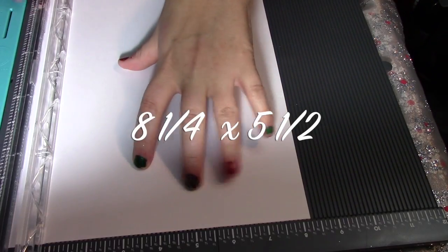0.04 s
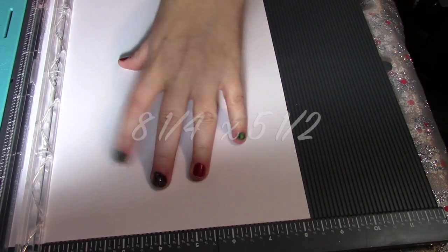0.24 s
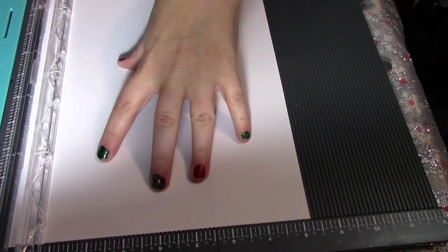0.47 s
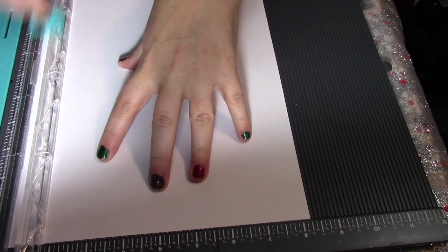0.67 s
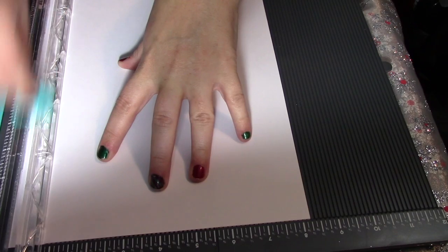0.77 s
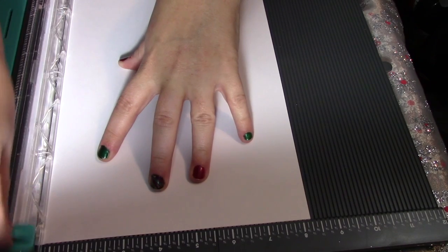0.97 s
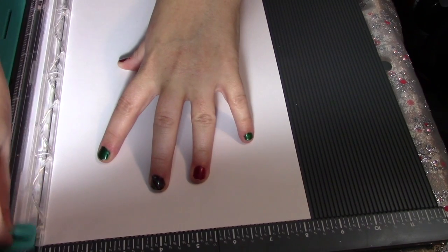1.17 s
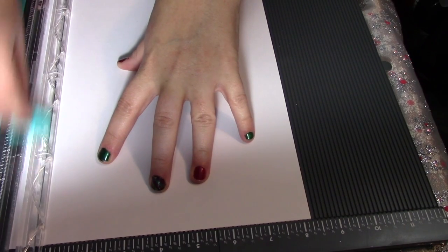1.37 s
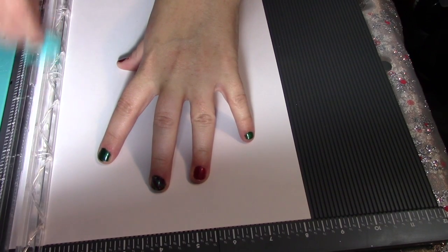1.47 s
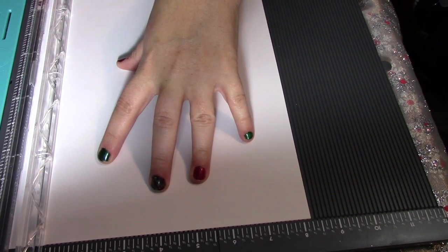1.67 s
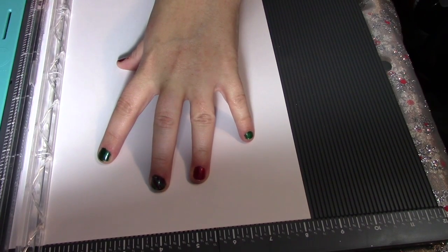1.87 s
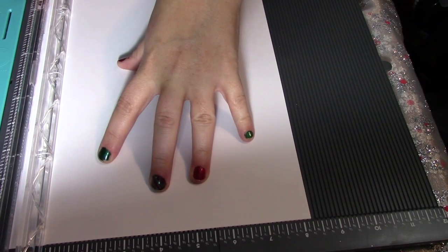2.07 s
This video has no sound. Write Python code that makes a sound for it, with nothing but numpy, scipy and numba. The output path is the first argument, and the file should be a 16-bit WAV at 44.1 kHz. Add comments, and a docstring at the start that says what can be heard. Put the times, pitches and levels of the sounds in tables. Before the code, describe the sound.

Paper trimmer cutting card in one scraping stroke, then sliding back with sharp plastic clicks.

```python
"""Paper trimmer on a craft table

A card brushes over the bed and the plastic guide rail clacks down. The blade carriage rasps through
the card, its friction grains ringing the rail, knocks against the far stop, slides back more lightly
and snaps against the near stop. Each knock is a noise crack plus damped modes. The table rings along;
the sound is close and nearly mono, in a small room with faint steady noise."""
import sys
import numpy as np
from scipy import signal
from scipy.fft import rfft, irfft
from scipy.io import wavfile
from scipy.ndimage import uniform_filter1d, minimum_filter1d
from numba import njit

SR = 44100
rng = np.random.default_rng(int(sys.argv[2]) if len(sys.argv) > 2 else 0)


def store_pcm(level_fs):
    """Save levels as 16-bit WAV."""
    pcm = np.round(np.clip(level_fs, -1, 1) * 32767).astype(np.int16)
    wavfile.write(sys.argv[1], SR, np.atleast_2d(pcm).T)


N = 93315
T = np.arange(N) / SR


def undb(db):
    """Decibels to gain."""
    return 10 ** (np.asarray(db) / 20)


def unit_rms(x):
    """Scale to rms 1."""
    return x / np.sqrt(np.mean(x ** 2))


def unit_energy(x):
    """Scale to energy 1."""
    return x / np.sqrt(np.sum(x ** 2))


def convolve(x, response):
    """Convolve, keeping the length."""
    return signal.fftconvolve(x, response)[:len(x)]


def colour(x, spectrum, size=2048):
    """Minimum-phase filter from (f/Hz, level/dB) points."""
    hz, db = np.array(spectrum, float).T
    bins_hz = np.arange(size // 2 + 1) * SR / size
    gain = undb(np.interp(np.log(bins_hz + 1), np.log(hz), db))
    cepstrum = irfft(np.log(gain))
    cepstrum[1:size // 2] *= 2
    cepstrum[size // 2 + 1:] = 0
    return convolve(x, irfft(np.exp(rfft(cepstrum))))


def split(x, edges_hz):
    """Zero-phase bands that sum flat."""
    bands = []
    for hz in edges_hz:
        bands.append(signal.sosfiltfilt(signal.butter(3, hz, fs=SR, output="sos"), x, padtype=None))
        x = x - bands[-1]
    return bands + [x]


def ring(modes, t, wave=np.sin):
    """Damped sinusoids from (f/Hz, level/dB, t60/s) rows."""
    return sum(undb(db - 60 * t / t60) * wave(2 * np.pi * hz * t) for hz, db, t60 in modes)


def wander(rate_hz):
    """Smooth random curve, rms 1."""
    hold = int(SR / rate_hz)
    steps = np.repeat(rng.standard_normal(N // hold + 1), hold)
    return unit_rms(uniform_filter1d(steps, hold)[:N])


@njit
def resonate(x, hz, width_hz):
    """State-variable band-pass with a moving centre."""
    y, band_state, low_state = np.empty(len(x)), 0., 0.
    for i in range(len(x)):
        g, damping = np.tan(np.pi * hz[i] / SR), width_hz / hz[i]
        band = (band_state + g * (x[i] - low_state)) / (1 + g * (g + damping))
        band_state = 2 * band - band_state
        low_state += 2 * g * band
        y[i] = damping * band
    return y


# noise spectrum: f/Hz, level/dB
ROOM_NOISE_SPECTRUM = [(25,-9),(60,-11.5),(110,3.5),(330,10),(500,5.5),(1000,1.5),(3000,-5.5),(8000,-15),(12000,-18),(16000,-28.5)]

def room_noise(level_db=-57.5):
    """Steady, dull background noise."""
    return undb(level_db) * unit_rms(colour(rng.standard_normal(N), ROOM_NOISE_SPECTRUM))


def grains(rate_per_s=6500, scatter_db=.7):
    """Friction: dense tiny slips and snapping fibres of uneven size."""
    impulses = (rng.random(N) < rate_per_s / SR) * rng.choice([-1, 1], N)
    return impulses * undb(scatter_db * np.minimum(rng.exponential(size=N), 4))


# card moves: t/s, length/s, hiss level/dB, rub level/dB
BRUSHES = [(0.042,0.057,-47,-69),(0.217,0.071,-50,-42.5),(0.287,0.095,-60,-52)]
# hiss and rub spectra: f/Hz, level/dB
HISS_SPECTRUM = [(2000,-16),(5000,-9),(6500,1.5),(8500,2.5),(11000,-10),(16000,-21)]
RUB_SPECTRUM = [(60,-39),(130,5),(300,1),(600,9),(1100,-11),(3000,-9.5),(8000,-44)]

def card_brushes():
    """The card slips over the bed under the hand: soft hiss over a dull rub."""
    hiss = unit_rms(colour(grains(), HISS_SPECTRUM))
    rub = unit_rms(colour(grains(), RUB_SPECTRUM))
    out = 0
    for start_s, length_s, hiss_db, rub_db in BRUSHES:
        progress = np.clip((T - start_s) / length_s, 0, 1)
        swell = np.abs(np.sin(np.pi * progress)) ** .95
        out += swell * (undb(hiss_db) * hiss + undb(rub_db) * rub)
    return out


# contact noise spectrum: f/Hz, level/dB
CRACK_SPECTRUM = [(40,-35.5),(80,-7.5),(130,4),(300,3),(600,-0.5),(1000,4),(1700,4),(4200,-1),(5000,-2.5),(6500,1.5),(9000,-4),(12000,-9),(16000,-31)]

def knocks(hits, modes, edges_hz=(280, 900, 2200, 4600)):
    """Chattering contact, short plastic ring and dry rattle, levelled in five bands; treble dies first."""
    contact_s, seat_s, level_span_s = .0025, .002, .003
    crack_decay_s, rattle_decay_s, tick_decay_s, tick_rest_db = .0014, .015, .0034, -10
    lead = SR // 200  # space for the band filters' pre-ring
    t = np.maximum(T[:SR // 7] - lead / SR, 0)
    attack = np.minimum(t / contact_s, 1) ** .5
    contact = unit_energy(attack * np.exp(-np.maximum(t - contact_s, 0) / crack_decay_s))
    rattle = unit_energy(attack * np.exp(-t / rattle_decay_s))
    out = np.zeros(2 * N)
    for start_s, *bands_db, modes_db, rattle_db in hits:
        envelope = np.hypot(contact, undb(rattle_db) * rattle)
        crack = colour(envelope * rng.standard_normal(len(t)), CRACK_SPECTRUM)
        detuned = [(hz * (1 + .012 * rng.standard_normal()), db, t60) for hz, db, t60 in modes]
        ringing = ring(detuned, t) * (1 - np.exp(-t / seat_s))
        bands = split(undb(modes_db) * unit_energy(ringing) + unit_energy(crack), edges_hz)
        bands[-1] *= np.exp(-t / tick_decay_s) + undb(tick_rest_db)
        i = int(start_s * SR) - lead
        for band, db in zip(bands, bands_db):
            out[i:i + len(t)] += unit_energy(band) * undb(db) * np.sqrt(level_span_s * SR)
    return out[:N]


# card and rail hits: t/s, 5 x band level/dB (low to high), modes/dB re crack, rattle/dB re contact
RAIL_HITS = [(.1725,-42,-48,-43,-45,-37,-17,-2),(.1790,-56,-40.5,-43.5,-74,-33.5,-22,-30),(.2260,-42.5,-31,-51,-68,-52,-7,2),(.2670,-59,-37,-23.5,-18.5,-37.5,-1.5,-3),(.2895,-60,-32,-31,-46,-52,-26,-4),(.4175,-63,-41.5,-37.5,-34.5,-75,-30,-1.5)]
# rail modes: f/Hz, level/dB, t60/s
RAIL_MODES = [(574,-6,0.038),(805,-9.5,0.058),(1730,1.5,0.022),(3356,-10,0.025),(4100,8,0.015),(6000,-3,0.019)]

def rail_clacks():
    """The card is nudged and the guide rail clacks down."""
    return knocks(RAIL_HITS, RAIL_MODES)


def squeaks(rate_per_s=600, range_hz=(2500, 14000), length_s=.014, max_glide=.03):
    """Fibres and plastic squeak: short gliding whistles, random in time and pitch."""
    out, t = np.zeros(2 * N), T[:int(length_s * SR)]
    for when, pitch, glide, size in rng.random((int(rate_per_s * N / SR), 4)):
        hz = np.interp(pitch, (0, 1), range_hz) * (1 + max_glide * (2 * glide - 1) * t / length_s)
        i = int(when * N)
        out[i:i + len(t)] += size ** 2 * np.hanning(len(t)) * np.sin(2 * np.pi * np.cumsum(hz) / SR)
    return unit_rms(out[:N])


# sliding friction spectrum: f/Hz, level/dB
FRICTION_SPECTRUM = [(30,-72.5),(70,-27.5),(120,-5),(300,-0.5),(700,-4),(2000,-1.5),(4000,-7),(7000,-8.5),(10000,-12.5),(13000,-22.5),(16000,-28.5)]
# rail and bed resonances: f/Hz, width/Hz, cutting level/dB, return level/dB
SLIDE_RESONANCES = [(252.5,28,1,0),(338,12,-7,-2.5),(464,250,3,-14),(588,47,-1.5,-1),(720,87,10.5,2),(861,75,6.5,-1),(976,14,-8,5.5),(1164,193,3.5,-2.5),(1384,83,-4,3),(1644,77,2,7.5),(2137,60,-1.5,-5),(3003,590,3.5,5),(3610,86,3,0),(4180,270,-0.5,-16.5),(5700,990,-6,-16),(8630,490,3,-1.5),(9600,480,0,-8),(11920,600,-4.5,-11)]

def slide(envelope, cutting, edges_hz=(1500, 5000)):
    """Juddering friction grains ring the rail, whose resonances waver as the contact moves."""
    judder_db, judder_hz, waver_db, waver_hz = 1.3, 140, 2.6, 65
    bypass_db, squeak_db = -6.5, -10.5
    judder = undb(judder_db * wander(judder_hz))
    slips = grains() * judder
    body = undb(bypass_db) * grains() * judder
    for hz, width_hz, cut_db, return_db in SLIDE_RESONANCES:
        drift = .018 * (1 + hz / 5000)  # high resonances wander furthest
        centre_hz = hz * (1 + drift * wander(waver_hz / 2))
        level_db = (cut_db if cutting else return_db) + waver_db * wander(waver_hz)
        body += undb(level_db) * resonate(slips, centre_hz, float(width_hz))
    friction = colour(unit_rms(body) + undb(squeak_db) * squeaks(), FRICTION_SPECTRUM)
    times_s, *bands_db = np.array(envelope).T
    sliding = (T > times_s[0]) & (T < times_s[-1])
    gains = [undb(np.interp(T, times_s, db, left=-120, right=-120)) for db in bands_db]
    return sum(band / band[sliding].std() * gain for band, gain in zip(split(friction, edges_hz), gains))


# cut envelope: t/s, body level/dB, rasp level/dB, hiss level/dB
CUT_ENVELOPE = [(.43,-57.5,-69.5,-75),(.555,-56.5,-51,-56),(.572,-44,-46.5,-54),(.586,-29,-27.5,-33),(.66,-32.5,-28.5,-29),(.75,-28.5,-28,-29.5),(.83,-27.5,-27,-30),(.91,-29,-27.5,-30.5),(1.0,-37.5,-33.5,-39),(1.025,-35,-40,-52)]

def cut_stroke():
    """The blade carriage rasps through the card."""
    return slide(CUT_ENVELOPE, cutting=True)


# bed hits: columns as RAIL_HITS
BED_HITS = [(.5745,-38,-22,-19.5,-31.5,-42,5,-20),(1.1718,-47,-39,-31,-51,-42,-20,-4),(1.6575,-46.5,-28,-28.5,-31.5,-51.5,-13.5,-2.5)]
# bed modes: f/Hz, level/dB, t60/s
BED_MODES = [(378,-4,0.038),(493,5.5,0.017),(1228,3.5,0.021),(1490,1.5,0.025),(3170,-15.5,.012)]

def bed_bumps():
    """The blade is pressed onto the bed; later the carriage bumps on it."""
    return knocks(BED_HITS, BED_MODES)


# carriage hits: columns as RAIL_HITS
CARRIAGE_HITS = [(.7858,-54,-37,-19,-46,-44,-25,-22),(1.1440,-41.5,-44.5,-41.5,-45,-48,-17,7),(1.1565,-50.5,-40,-52,-39.5,-65,-16,-12),(1.7604,-45,-30,-17,-6.5,-20.5,4,-5.5),(1.7730,-45,-38.5,-28.5,-21,-33.5,-10,6),(1.8905,-65,-32.5,-32,-30.5,-59,-28,2.5),(1.964,-66,-74,-61.5,-58,-57.5,-12,-3)]
# carriage modes: f/Hz, level/dB, t60/s
CARRIAGE_MODES = [(671,-9,.03),(830,-8.5,0.034),(1432,-6,0.035),(1717,7.5,0.012),(2500,-14.5,.015),(3030,-8,.01),(3750,8.5,.008),(4100,-2,0.0068),(5950,2.5,0.0076)]

def carriage_knocks():
    """The carriage knocks on its way, then snaps against the near stop and rebounds."""
    return knocks(CARRIAGE_HITS, CARRIAGE_MODES)


# far stop hit: columns as RAIL_HITS
FAR_STOP_HITS = [(1.0064,-28.5,-23.5,-23.5,-13,-29.5,0,-5)]
# far stop modes: f/Hz, level/dB, t60/s
FAR_STOP_MODES = [(244,-10.5,0.11),(596,-0.5,0.043),(1340,0.5,0.06),(1735,5,0.028),(2036,-1,0.027),(2665,-3,.02),(3330,7,0.014),(4120,-8,0.016),(5900,-0.5,0.044)]

def far_stop_knock():
    """The carriage meets the far stop at the end of the cut."""
    return knocks(FAR_STOP_HITS, FAR_STOP_MODES)


# return envelope: t/s, body level/dB, rasp level/dB, hiss level/dB
RETURN_ENVELOPE = [(1.15,-80,-52,-90),(1.215,-49,-51,-54),(1.25,-42.5,-35.5,-43.5),(1.365,-41,-42.5,-45.5),(1.385,-31.5,-28.5,-41),(1.42,-42,-41.5,-41),(1.475,-30,-29.5,-40.5),(1.51,-36,-34.5,-43.5),(1.56,-35.5,-30.5,-44.5),(1.64,-38.5,-42.5,-52),(1.70,-51,-49,-58),(1.77,-53,-54.5,-58.5)]

def return_stroke():
    """The carriage slides back more lightly."""
    return slide(RETURN_ENVELOPE, cutting=False)


# craft table modes: f/Hz, level/dB, t60/s
TABLE_MODES = [(252,-59,.24),(339,-55,.24),(490,-58,.16),(603,-58,.18),(688,-55,.18),(870,-61,.14)]

def table_ring(direct):
    """The table rings under the trimmer."""
    return convolve(direct, ring(TABLE_MODES, T, np.cos))


# reflection spectrum: f/Hz, level/dB
ROOM_SPECTRUM = [(60,5),(200,6),(800,-1.5),(2500,-8),(4500,-11),(8000,-13),(16000,-37.5)]

def room_reverb(direct, edges_hz=(700, 2500, 6000), t60s_s=(.17, .19, .22, .24)):
    """Early reflections from the table top and the short tail of the room."""
    delay_s, early_decay_s, early_db, tail_db = .0069, .017, -15.5, -8.5
    t = T[:SR // 2]
    bands = split(rng.standard_normal(len(t)), edges_hz)
    tail = sum(band * undb(-60 * t / t60) for band, t60 in zip(bands, t60s_s))
    early = rng.standard_normal(len(t)) * np.exp(-t / early_decay_s)
    arrived = t > delay_s
    response = undb(tail_db) * unit_energy(tail * arrived) + undb(early_db) * unit_energy(early * arrived)
    return convolve(direct, colour(response, ROOM_SPECTRUM))


# side signal re mid: f/Hz, level/dB
LEAN_SPECTRUM = [(1000,-87),(2500,-34.5),(10000,-31.5)]
# microphone noise spectrum: f/Hz, level/dB
MIC_NOISE_SPECTRUM = [(25, 0), (100, -1.5), (300, 8.5), (1000, .5), (5000, -19), (16000, -36)]

def microphones(mid, lag_s=1.5e-6, noise_db=-67):
    """Nearly mono pair: treble leaning slightly left, a tiny lag and faint noise between the two."""
    noise = undb(noise_db) * unit_rms(colour(rng.standard_normal(N), MIC_NOISE_SPECTRUM))
    side = colour(mid, LEAN_SPECTRUM) + np.gradient(mid) * SR * lag_s / 2 + noise
    return np.array([mid + side, mid - side])


def scene(low_cut_hz=69):
    """Trimmer and card on the ringing table, over quiet room noise."""
    strokes = cut_stroke() + return_stroke()
    hits = rail_clacks() + bed_bumps() + far_stop_knock() + carriage_knocks()
    low_cut = signal.butter(4, low_cut_hz, "high", fs=SR, output="sos")  # the direct sound carries no deep bass
    direct = signal.sosfilt(low_cut, strokes + hits + card_brushes())
    return microphones(direct + room_noise() + table_ring(direct) + room_reverb(direct))


def record(dry, ceiling=.9, reaction_s=.002, top_hz=15950):
    """Peak limiter, then a steep low-pass."""
    size = int(reaction_s * SR)
    gain = np.minimum(1, ceiling / (np.abs(dry).max(axis=0) + 1e-9))
    gain = uniform_filter1d(minimum_filter1d(gain, size), size)
    return signal.sosfilt(signal.ellip(8, .2, 70, top_hz, fs=SR, output="sos"), dry * gain)


dry = scene()
out = record(dry)
store_pcm(out)
```